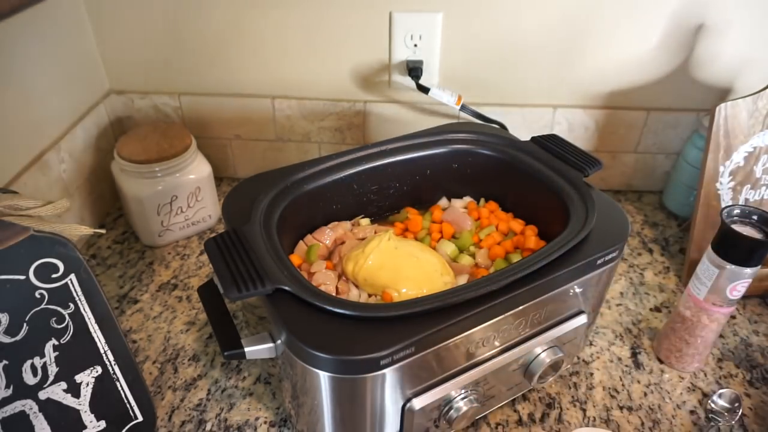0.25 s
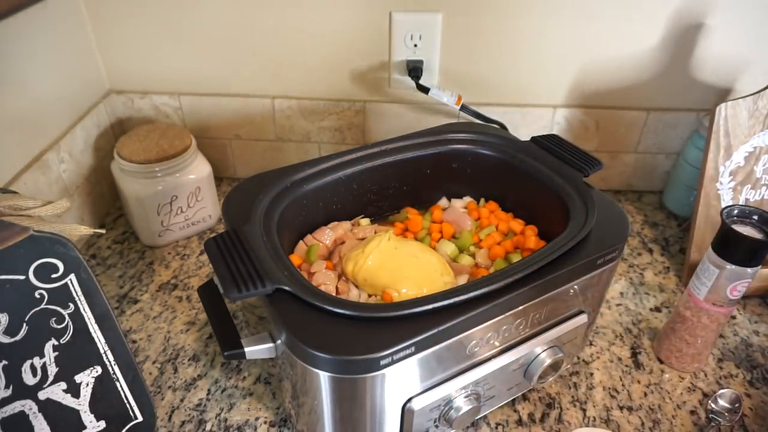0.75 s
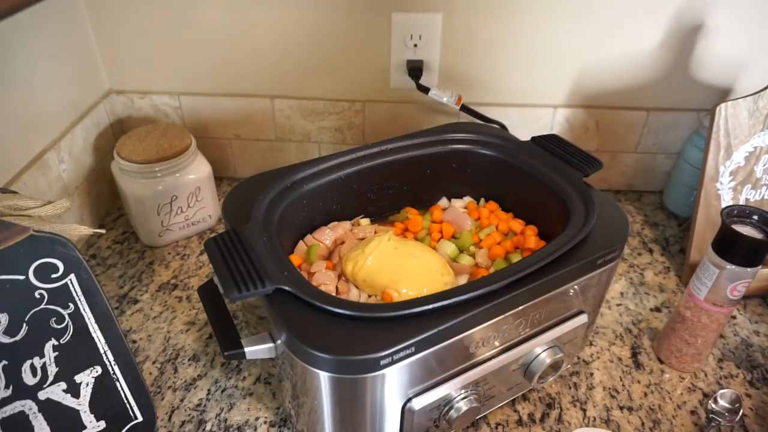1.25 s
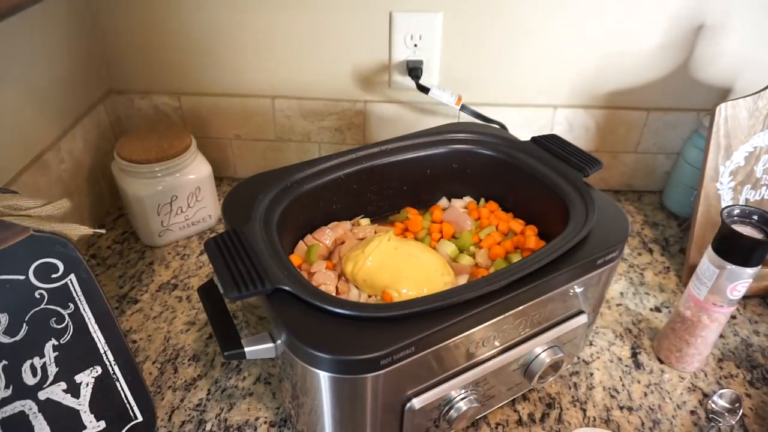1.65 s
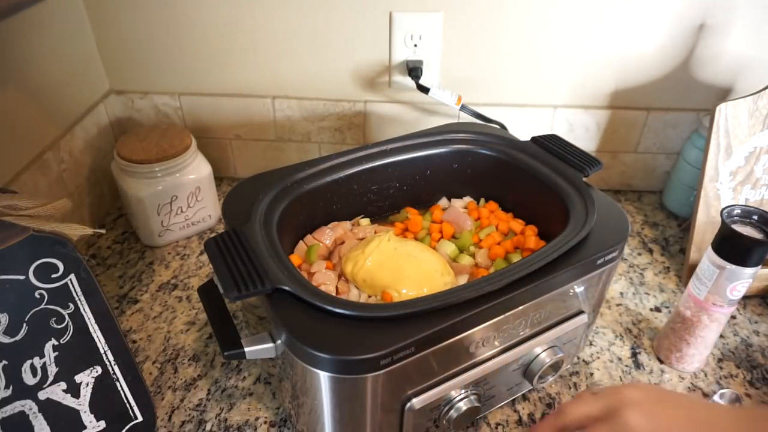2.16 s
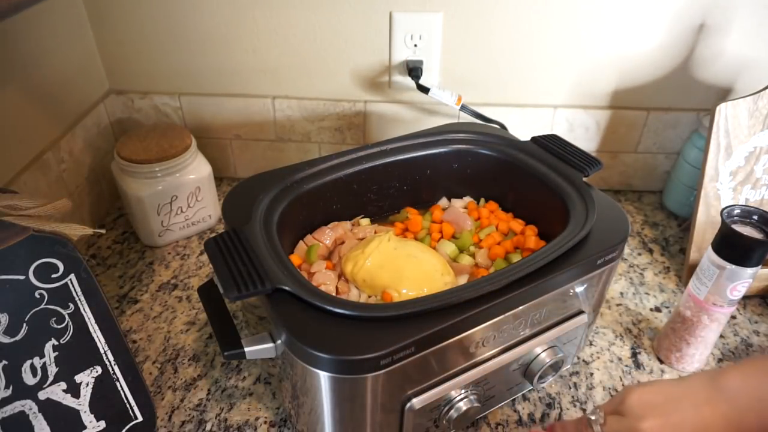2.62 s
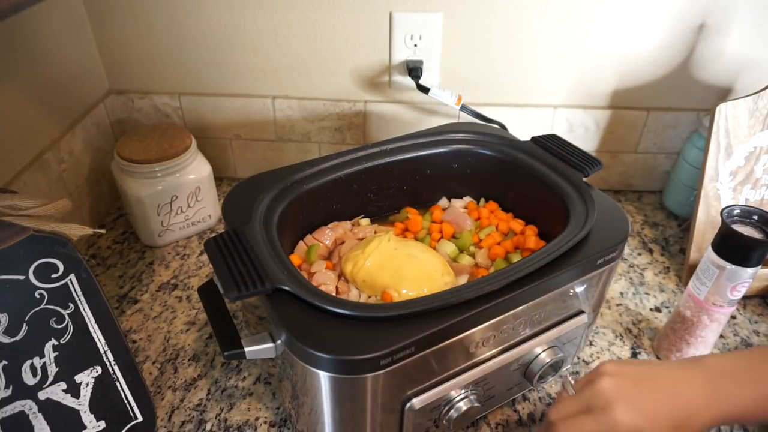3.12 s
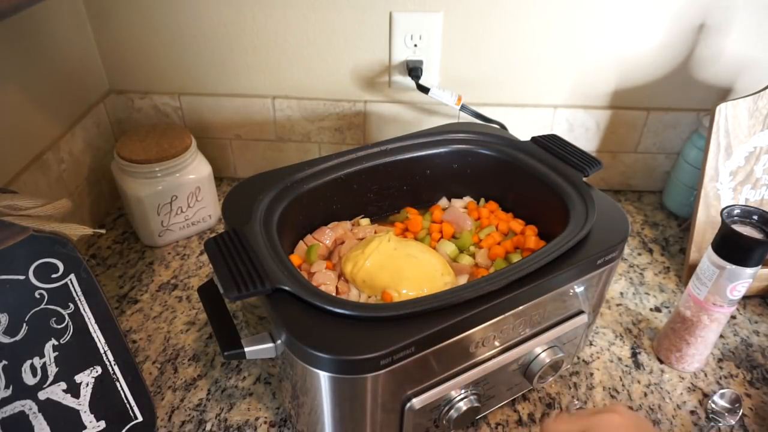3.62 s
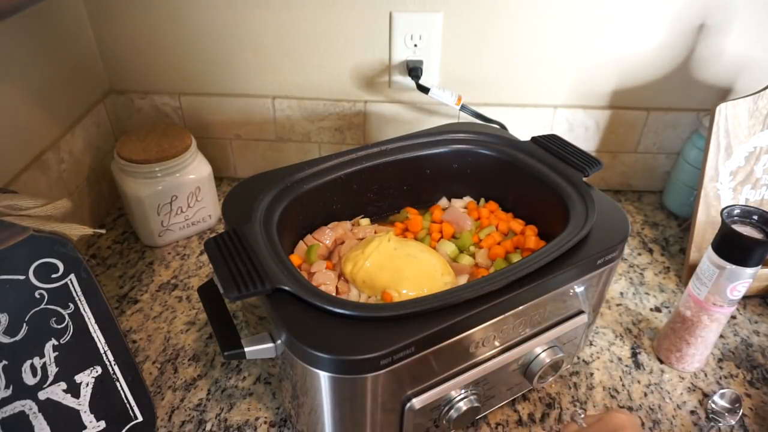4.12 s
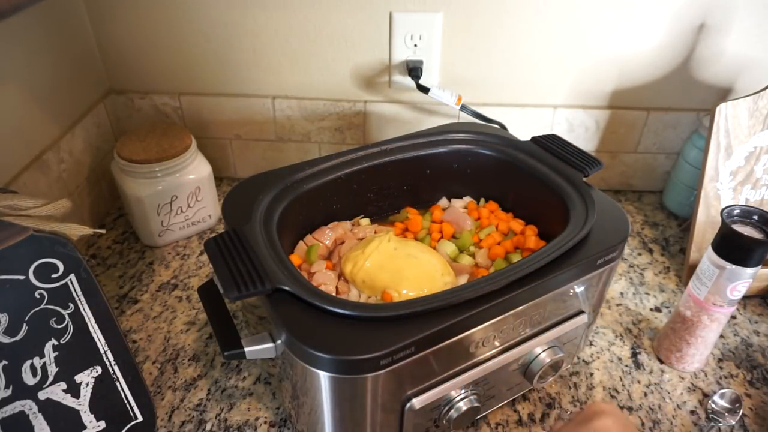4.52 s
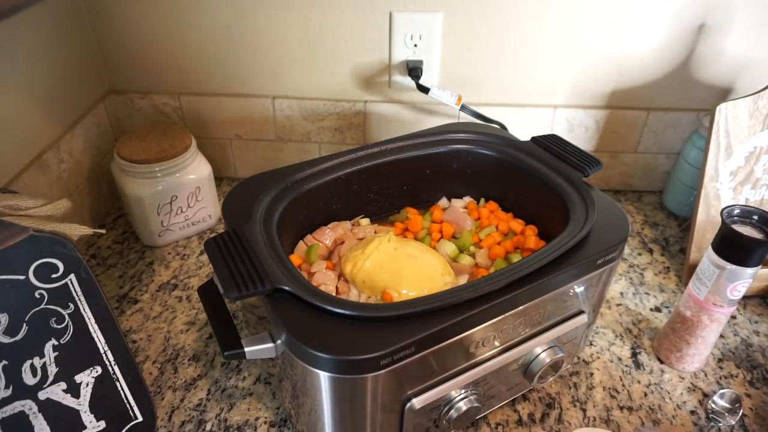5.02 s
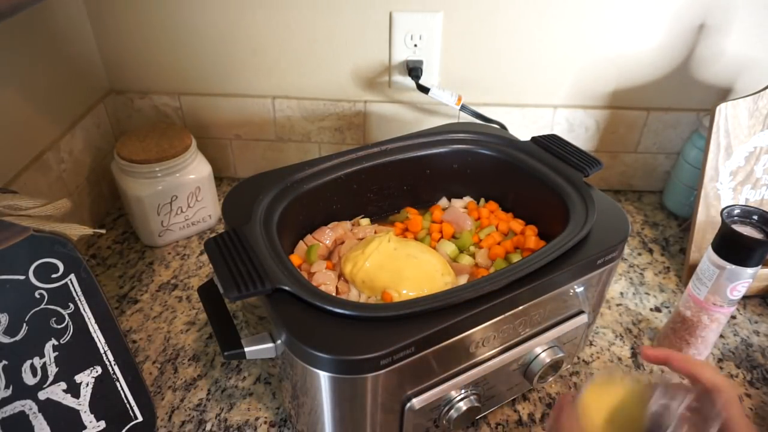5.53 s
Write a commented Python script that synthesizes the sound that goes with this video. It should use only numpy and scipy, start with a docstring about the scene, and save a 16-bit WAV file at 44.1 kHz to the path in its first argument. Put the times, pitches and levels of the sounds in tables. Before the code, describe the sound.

Faint ticks and a dying low hum open the scene. Several muffled metallic can bumps come in quick succession, followed by gritty scraping on stone and short hollow lid knocks. After a softer gap, a can lands with a clack and low counter thud, then a thin metal rim snaps and chatters. Reflective kitchen, near stereo pickup, action slightly to the right.

```python
"""A low rumble under room tone is heard first, with faint ticks of fingers; then food cans clatter a step away.
Full cans are slid, knocked and set down on a stone counter close by; one rim cracks brightly. The rumble dies away.
Hum and grit are shaped noise. Each contact excites decaying modes over a wash of dense modes,
and a synthetic kitchen response adds echoes and a tail. All cans sit to the right."""
import sys
import numpy as np
from scipy import signal
from scipy.fft import rfft, irfft, next_fast_len
from scipy.io import wavfile
from scipy.ndimage import uniform_filter1d

SR = 44100
rng = np.random.default_rng(int(sys.argv[2]) if len(sys.argv) > 2 else 0)


def master(y):
    """Save y as 16-bit WAV."""
    cut = np.clip(np.atleast_2d(y).T, -1, 1)
    pcm = np.round(cut * 32767)  # scale
    wavfile.write(sys.argv[1], SR, pcm.astype(np.int16))


N = 254456
TIME = np.arange(N) / SR
RING = np.arange(int(0.6 * SR)) / SR  # time axis of one ring or room response, s
PORT_GAP_M, SOUND_M_PER_S = 0.099, 343
LEFT_LAG_S = 0.05e-3
GRAZE_S = 0.004
REST_DB = -53  # a weaker bounce does not lift off
TOP_HZ = 15800


def undb(db):
    """Decibels to gain."""
    return 10 ** (np.asarray(db) / 20)


def unit(x):
    """Scale to a mean channel energy of 1."""
    return x / np.sqrt(np.mean(np.sum(x ** 2, axis=-1)))


def level(x, db):
    """Scale to an rms level."""
    return x * undb(db) / np.sqrt(np.mean(x ** 2))


def on_log(points, hz):
    """Read (f/Hz, value) points on a log-frequency axis."""
    f, value = np.transpose(points)
    return np.interp(np.log(hz + 1), np.log(f), value)


def filtered(x, gain):
    """Apply a gain that is a function of frequency."""
    n = x.shape[-1]
    return irfft(rfft(x) * gain(np.fft.rfftfreq(n, 1 / SR)), n)


def resonance(f, hz, width_hz):
    """Gain of one rounded peak."""
    return 1 / (1 + ((f - hz) / width_hz) ** 2)


def wobble(size, rate_hz):
    """Smooth random motion with a spread of 1."""
    noise = rng.standard_normal(size)
    return level(filtered(noise, lambda f: np.exp(-f / rate_hz)), 0)


def diffuse(size, spectrum=None):
    """Noise arriving from all sides at two ports: alike in the bass, unrelated in the treble."""
    alike = lambda f: np.sinc(2 * f * PORT_GAP_M / SOUND_M_PER_S) * 0.96
    mid = filtered(rng.standard_normal(size), lambda f: np.sqrt(1 + alike(f)))
    side = filtered(rng.standard_normal(size), lambda f: np.sqrt(1 - alike(f)))
    pair = np.array([mid + side, mid - side])
    if spectrum is None:
        return pair
    return filtered(pair, lambda f: undb(on_log(spectrum, f)))


def fade(t60_s):
    """Exponential decay, 60 dB down after t60_s."""
    return np.exp(-np.log(1000) * RING / t60_s)


def even(x, width_hz=70):
    """Flatten a response's smoothed power spectrum, so that no pitch is favoured."""
    n = x.shape[-1]
    size = next_fast_len(2 * n, True)
    spectrum = rfft(x, size)
    power = np.mean(np.abs(spectrum) ** 2, axis=0)
    power = uniform_filter1d(power, int(width_hz * size / SR) + 1)
    return irfft(spectrum / np.sqrt(power), size)[:, :n]


def add(out, s, sound, db):
    """Mix in a hit, which starts with its graze; its level is its energy spread over 30 ms."""
    i = int((s - GRAZE_S) * SR)
    sound = unit(sound)[:, :N - i] * np.sqrt(0.03 * SR)
    out[:, i:i + sound.shape[1]] += undb(db) * sound


def to_right(x, db, above_hz=700):
    """Source on the right: the left port gets it later, and shaded above the bass."""
    tilt_db = np.array([[-0.5], [0.5]]) * db
    lag_s = np.array([[LEFT_LAG_S], [0]])
    shade = lambda f: undb(tilt_db * f ** 2 / (f ** 2 + above_hz ** 2))
    return filtered(x, lambda f: shade(f) * np.exp(-2j * np.pi * f * lag_s))


# kitchen tail decay: [f/Hz, t60/s]
KITCHEN_T60 = [(150, 0.34), (400, 0.39), (1000, 0.43), (2800, 0.55), (7000, 0.36), (16000, 0.3)]


def kitchen(early_db, tail_db, early_t60_s=0.068):
    """Room response: direct sound, quick echoes off counter and tiles, then a tail decaying by band."""
    noise, tail = diffuse(len(RING)), 0
    centres_hz = np.geomspace(125, 16000, 8)
    for hz, share in zip(centres_hz, np.eye(len(centres_hz))):
        band = filtered(noise, lambda f: on_log(np.c_[centres_hz, share], f))
        tail = tail + band * fade(on_log(KITCHEN_T60, hz))
    # echoes and tail both build up gradually
    early = diffuse(len(RING)) * fade(early_t60_s) * (1 - fade(0.0022))
    tail = tail * (1 - fade(0.051))
    response = undb(early_db) * unit(early) + undb(tail_db) * unit(tail)
    response[:, 0] += 1
    return response


def body(modes, dense, dense_db, dense_t60_s, rise_s, low_hz, scatter_db=2.95):
    """One blow's ring: clear modes, weighted by where it lands, over a wash of short dense modes."""
    hz, db, t60_s = np.transpose(modes)[:, :, None]
    weight, detune, sign = rng.standard_normal((len(hz), 3)).T[:, :, None]
    swing = np.sign(sign) * np.sin(2 * np.pi * hz * (1 + 0.0018 * detune) * RING)
    clear = np.sum(undb(db + scatter_db * weight) * fade(t60_s) * swing, axis=0)
    wash = rng.standard_normal((1, len(RING))) * fade(dense_t60_s)
    wash = even(wash, width_hz=75)[0]
    # a second fade shortens the wash further
    wash = filtered(wash, lambda f: undb(on_log(dense, f))) * fade(0.31)
    ring = unit(clear) + undb(dense_db) * unit(wash)
    # swells as the contact closes
    ring = ring * (1 - np.exp(-RING / rise_s))
    # a small body radiates little bass
    return signal.sosfilt(signal.butter(3, low_hz, "high", fs=SR, output="sos"), ring)


def strike(ring, room, bright_hz, rattle_s, bounce=0.47, graze_db=-22, count=4):
    """Graze, blow and quick rebounds drive the ring into the room; a soft contact loses the treble."""
    graze = rng.standard_normal(int(GRAZE_S * SR))
    graze *= undb(graze_db) * np.linspace(0, 1, len(graze)) ** 2
    rebounds = np.zeros(int(rattle_s * SR) + 1)
    place, size = rng.random((count, 2)).T
    rebounds[(place * rattle_s * SR).astype(int)] = bounce * np.cos(2 * np.pi * size)
    force = np.r_[graze, 1, rebounds]
    soften = signal.butter(2, min(bright_hz, 0.45 * SR), fs=SR, output="sos")
    echoes = even(signal.fftconvolve(room, force[None], axes=1))
    return signal.fftconvolve(signal.sosfilt(soften, ring)[None], echoes, axes=1)


def bounces(s, db, bright_hz, bounce, count):
    """A contact and its bounces, each weaker and duller, until rest: [t/s, level/dB, brightness f/Hz]."""
    gap_s, step_db, kept = bounce
    rows = [(s + k * gap_s, db + k * step_db, bright_hz * kept ** k) for k in range(count)]
    return rows[:1] + [row for row in rows[1:] if row[1] > REST_DB]


def blows(contacts, ring, room, rattle_s):
    """Strike one object at each contact [t/s, level/dB, brightness f/Hz], with a fresh ring each time."""
    out = np.zeros((2, N))
    for s, db, bright_hz in contacts:
        add(out, s, strike(ring(), room, bright_hz, rattle_s), db)
    return out


# room tone, relative density: [f/Hz, level/dB]
TONE_SPECTRUM = [(15, -55), (25, -6), (59, -17), (102, 3.5), (149, -15), (180, -4), (285, -1.5), (326, -23),
                 (363, -23), (516, -2.5), (775, -19), (1130, -12.5), (1370, -15.5), (8360, -22.5),
                 (16000, -24)]
# low appliance rumble with thin hiss, relative density: [f/Hz, level/dB]
RUMBLE_SPECTRUM = [(15, -43), (25, -14.5), (102, -2), (153, -7.5), (285, -2), (326, -10), (373, -1),
                   (607, -16.5), (714, -17), (1020, -25.5), (1840, -25.5), (2990, -32), (7310, -40),
                   (12200, -36.5), (16000, -41)]
# rumble dying away, mean level: [t/s, level/dB]
RUMBLE_DECAY = [(0, -49), (1.05, -56.5), (1.7, -59), (2.3, -65), (5.0, -66), (5.77, -71)]


def background(waver_db=1.28):
    """Steady room tone, and a wavering rumble that dies away: two shaped diffuse noises."""
    rumble_db = np.interp(TIME, *np.transpose(RUMBLE_DECAY))
    rumble_db = rumble_db + waver_db * wobble(N, rate_hz=25)
    rumble = level(diffuse(N, RUMBLE_SPECTRUM), 0) * undb(rumble_db)
    return level(diffuse(N, TONE_SPECTRUM), -66) + rumble


# clear ticks of rims and fingernails, before panning: [t/s, level/dB]
CLEAR_TICKS = [(1.93, -57), (2.769, -49.5), (2.964, -35), (3.868, -58.5), (4.006, -50.5), (4.084, -58),
               (4.293, -50)]
# dense modes of a tick, relative: [f/Hz, level/dB]
TICK_SPECTRUM = [(300, -12.5), (1200, -3.5), (2500, 2.5), (4500, -1), (7000, 0), (11000, 3.5),
                 (16000, -6.5)]
# fingers feel over the cans, mean level before panning: [start t/s, length t/s, level/dB]
FINGER_SPANS = [(0.334, .55, -67), (3.549, .7, -68.5)]


def ticks(scatter_db=3.0, count=4):
    """Tiny hard contacts stir only dense high modes; faint ones fall at random while fingers are busy."""
    out, room = np.zeros((2, N)), kitchen(early_db=4.0, tail_db=-2.5)
    faint = []
    for start_s, length_s, db in FINGER_SPANS:
        for k in range(count):
            s = start_s + length_s * (k + rng.random()) / count
            faint.append((s, db + scatter_db * rng.standard_normal()))
    for s, db in CLEAR_TICKS + faint:
        ring = diffuse(len(RING), TICK_SPECTRUM)[0] * fade(0.026)
        add(out, s, strike(ring, room, bright_hz=16000, rattle_s=0.0091), db)
    return to_right(out, db=2.0)


# cans bumping a step away, first contact before panning: [t/s, level/dB, brightness f/Hz]
CLATTER_HITS = [(1.091, -25.5, 3700), (1.116, -27.5, 2300), (1.332, -27, 1970), (1.381, -25, 2220),
                (1.518, -27, 2800), (1.533, -22, 2950), (1.622, -32.5, 774), (1.672, -32.5, 1270)]
# bounce after each bump: (gap t/s, level step/dB, share of brightness kept)
CLATTER_BOUNCE = (.019, -10, 0.45)
# clear modes, relative: [f/Hz, level/dB, t60/s]
CLATTER_RING = [(374.4, -13, 0.12), (520, -14, 0.28), (690.4, -1, 0.1), (720.6, 4, 0.1), (916, -11.5, 0.1),
                (1061, 2, 0.064), (1158, -5, 0.056), (1336, -12, 0.041), (1472, 0.5, 0.074),
                (1783, -12, 0.12), (1890, -5.5, 0.13), (1936, -7.5, 0.21), (2342, -2.5, .08),
                (2800, -10, 0.12), (3520, -13.5, 0.12)]
# dense modes between them, relative: [f/Hz, level/dB]
CLATTER_WASH = [(100, -8), (250, -18), (420, -4.5), (580, -7.5), (850, 2), (1500, -0.5), (2400, -3),
                (3000, -10.5), (5000, -12), (9000, -18), (16000, -11.5)]


def clatter():
    """Cans bump and bounce once, a step away, so the room carries most of the sound."""
    ring = lambda: body(CLATTER_RING, CLATTER_WASH, dense_db=2.5, dense_t60_s=0.052,
                        rise_s=0.00077, low_hz=240)
    contacts = []
    for s, db, bright_hz in CLATTER_HITS:
        contacts += bounces(s, db, bright_hz, CLATTER_BOUNCE, count=2)
    room = kitchen(early_db=8.0, tail_db=2.0)
    return to_right(blows(contacts, ring, room, rattle_s=0.008), db=1.5)


# cans slid over stone, levels before push and panning:
# [start t/s, length t/s, grit level/dB, lid hum level/dB]
CAN_SLIDES = [(1.671, 0.55, -58, -61), (2.208, 0.13, -62.5, -68), (2.814, 0.058, -46, -58),
              (2.854, 0.091, -51.5, -78), (2.902, 0.089, -48, -79), (3.222, 0.044, -64, -50.5),
              (3.471, 0.28, -67, -63.5)]
# grit, relative density: [f/Hz, level/dB]
GRIT_SPECTRUM = [(500, -3), (2000, 11), (4000, 5), (8000, 6.5), (12000, 7.5), (16000, 3.5)]
# build-up and release are shares of the slide's length
PUSH_ATTACK, PUSH_EASE_DB_PER_S, PUSH_RELEASE = 0.1, -4.5, 0.35


def slides(grain_db=2.0, uneven_db=0.7, lid_hz=1030, lid_width_hz=110,
           wall_hz=3000, wall_width_hz=150, wall_db=3):
    """A rim catches on stone grain under an uneven push: grit rings the wall, and the lid hums."""
    out = np.zeros((2, N))
    wall = lambda f: 1 + undb(wall_db) * resonance(f, wall_hz, wall_width_hz)
    lid = lambda f: resonance(f, lid_hz, lid_width_hz)
    for s, length_s, grit_db, hum_db in CAN_SLIDES:
        near = (TIME > s) & (TIME < s + length_s)
        t = TIME[near] - s
        push = np.interp(t / length_s, [0, PUSH_ATTACK, 1 - PUSH_RELEASE, 1], [0, 1, 1, 0])
        ease_db = PUSH_EASE_DB_PER_S * (t - length_s / 2)
        push = push * undb(ease_db + uneven_db * wobble(len(t), rate_hz=15))
        catches = undb(grain_db * wobble(len(t), rate_hz=280))
        grit = filtered(diffuse(len(t), GRIT_SPECTRUM) * catches, wall)
        hum = filtered(diffuse(len(t)) * catches, lid)
        out[:, near] += push * (level(grit, grit_db) + level(hum, hum_db))
    return to_right(out, db=2.5)


# full cans knocked near by, level before panning, clack relative to the lid:
# [t/s, level/dB, lid pitch f/Hz, wall clack level/dB, brightness f/Hz]
CAN_KNOCKS = [(1.779, -37.5, 1017, -22, 1800), (2.086, -54, 1050, 7, 4560), (2.231, -49, 1054, 6, 5500),
              (2.284, -53, 1093, 2, 4500), (2.553, -61, 1106, -4, 4000), (2.768, -35, 1128, -5, 5440),
              (2.957, -26.5, 835, -0.5, 4870), (2.984, -38.5, 803, -14, 1980),
              (3.034, -39.5, 1056, -1, 2300), (3.236, -39.5, 1084, -5.5, 1570),
              (3.277, -36.5, 970, -3.5, 1290), (3.296, -43.5, 978, -2.5, 1190), (3.52, -56, 1089, 4, 1090),
              (3.73, -59.5, 987, 14, 900), (5.41, -65.5, 1206, -16, 1510)]
# lid loaded by the contents: [multiple of lid pitch, relative level/dB, share of lid t60]
LID_RING = [(1.001, 6.5, 0.91), (1.09, -27, 0.63), (1.22, -0.5, 0.33), (1.62, -10, 0.52), (2.15, -17, 0.87),
            (2.851, -10, 0.96)]
# dense modes of the wall, relative: [f/Hz, level/dB]
WALL_WASH = [(100, -18), (250, -9), (420, -8), (560, 9.5), (700, -4), (1150, 9), (1700, -3.5), (2400, 1.5),
             (4000, -8.5), (7000, -9), (16000, -9)]
# a lid rings LID_T60_S after a knock of KNOCK_DB; firmer contact damps it
KNOCK_DB, LID_T60_S, LID_DB_PER_HALVING = -36, 0.099, 17


def knocks():
    """A full can's lid gives a short hollow note, longer after a light touch, with a clack from its wall."""
    out, room = np.zeros((2, N)), kitchen(early_db=-1.5, tail_db=-8.5)
    for s, db, lid_hz, clack_db, bright_hz in CAN_KNOCKS:
        t60_s = LID_T60_S * 2 ** ((KNOCK_DB - db) / LID_DB_PER_HALVING)
        modes = np.array(LID_RING) * [lid_hz, 1, t60_s]
        ring = body(modes, WALL_WASH, clack_db, dense_t60_s=0.18, rise_s=0.00021, low_hz=220)
        add(out, s, strike(ring, room, bright_hz, rattle_s=0.0078, bounce=0.46), db)
    return to_right(out, db=3.0)


# a can's weight thuds into the counter, before panning: [t/s, level/dB]
SLAB_THUDS = [(3.033, -41.5), (4.401, -34.5)]
# slab on its cabinet, clear modes, relative: [f/Hz, level/dB, t60/s]
SLAB_RING = [(199.6, -13, 0.16), (226.5, 1, 0.12), (251, 5.5, 0.082), (330, -0.5, 0.06), (390, -3.5, 0.06)]
# slab dense modes, relative: [f/Hz, level/dB]
SLAB_WASH = [(40, -16), (130, -24), (300, -9), (500, -20), (1000, -27), (4000, -51.5)]


def thuds(room):
    """A can's weight excites the low modes of the slab through a soft contact."""
    slab = lambda: body(SLAB_RING, SLAB_WASH, dense_db=-4.0, dense_t60_s=0.092,
                        rise_s=0.0036, low_hz=44.7)
    contacts = [(s, db, 400) for s, db in SLAB_THUDS]  # brightness 400 Hz
    return blows(contacts, slab, room, rattle_s=0.0024)


# cans touch down, first contact before panning: [t/s, level/dB, brightness f/Hz]
LANDINGS = [(4.400, -28.3, 11100), (4.568, -50, 550), (5.117, -49.5, 5500)]
# bounce after touching down: (gap t/s, level step/dB, share of brightness kept)
LANDING_BOUNCE = (.017, -12, 0.32)
# can's base and wall, clear modes, relative: [f/Hz, level/dB, t60/s]
CAN_RING = [(443, -7.5, 0.083), (557, -2, 0.077), (917, 4, 0.16), (972, -3, 0.14), (1209, -1, 0.16),
            (1300, 6, 0.073), (2180, -5, 0.29), (2250, -5, 0.24), (2370, -4, 0.16), (2540, -12, 0.26),
            (3750, -21, .12)]
# can's dense modes, relative: [f/Hz, level/dB]
CAN_WASH = [(130, -26), (250, 5), (700, -5), (1200, 3.5), (1600, -6), (2200, 4.5), (3000, -12),
            (4200, -10.5), (8000, -16), (16000, -15.5)]


def set_downs():
    """Cans land on the counter: base and wall ring, a strong landing bounces, and the slab thuds."""
    room = kitchen(early_db=1.5, tail_db=-5.5)
    can = lambda: body(CAN_RING, CAN_WASH, dense_db=6.5, dense_t60_s=0.032,
                       rise_s=0.00076, low_hz=226)
    contacts = []
    for s, db, bright_hz in LANDINGS:
        contacts += bounces(s, db, bright_hz, LANDING_BOUNCE, count=2)
    return to_right(blows(contacts, can, room, rattle_s=0.005) + thuds(room), db=1.0)


# snapping rim, clear modes, relative: [f/Hz, level/dB, t60/s]
RIM_RING = [(661, -11, 0.1), (890, -21.5, 0.17), (1246, -8.5, 0.22), (1344, -3.5, 0.057), (1490, 4.5, 0.08),
            (1642, 2.5, 0.082), (1780, -14, 0.08), (2364, -16, .3), (2433, -20, 0.54), (4040, -9, 0.1),
            (4360, -5, 0.093), (5750, -12, 0.049)]
# rim dense modes, relative: [f/Hz, level/dB]
RIM_WASH = [(100, -14), (300, -12.5), (600, -7), (1400, 1), (2800, -4.5), (4400, -4), (6500, -5),
            (10000, -5.5), (14000, -9.5), (16000, -8.5)]
# chatter: (gap t/s, level step/dB, share of brightness kept)
RIM_CHATTER = (.0155, -3.86, 0.47)
# first snap, level before panning
CRACK_S, CRACK_DB, CRACK_HZ = 4.728, -26, 14100


def crack():
    """A can's thin metal rim snaps and chatters for a twentieth of a second."""
    ring = lambda: body(RIM_RING, RIM_WASH, dense_db=6.5, dense_t60_s=0.05,
                        rise_s=0.0019, low_hz=232)
    contacts = bounces(CRACK_S, CRACK_DB, CRACK_HZ, RIM_CHATTER, count=4)
    room = kitchen(early_db=2.7, tail_db=-2.2)
    return to_right(blows(contacts, ring, room, rattle_s=0.012), db=2.5)


def scene():
    """All the cans over the background."""
    return background() + ticks() + clatter() + slides() + knocks() + set_downs() + crack()


def record(dry):
    """Cut the top steeply above TOP_HZ."""
    return signal.sosfilt(signal.ellip(10, 0.2, 70, TOP_HZ, fs=SR, output="sos"), dry)


dry = scene()
out = record(dry)
master(out)
```